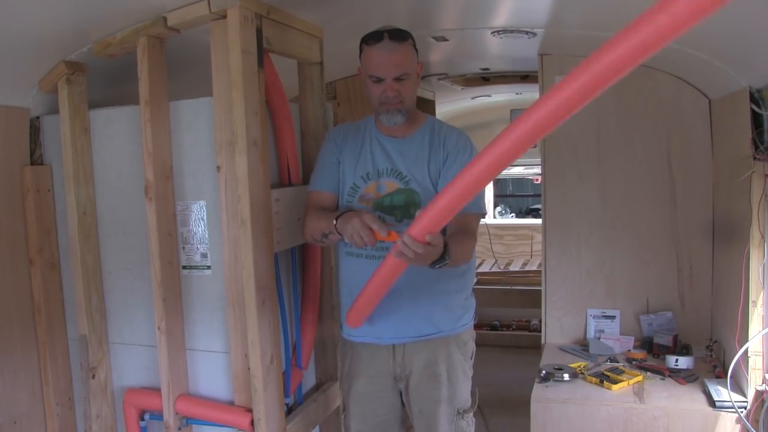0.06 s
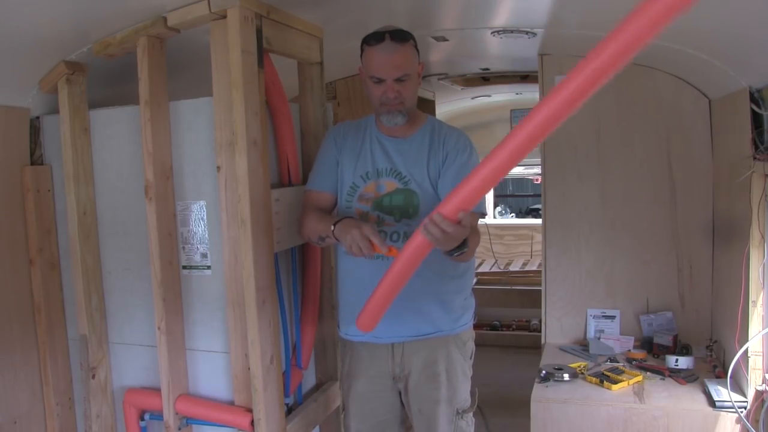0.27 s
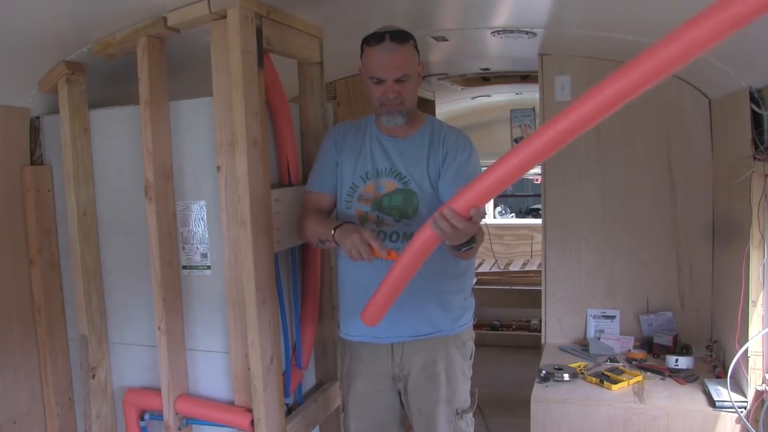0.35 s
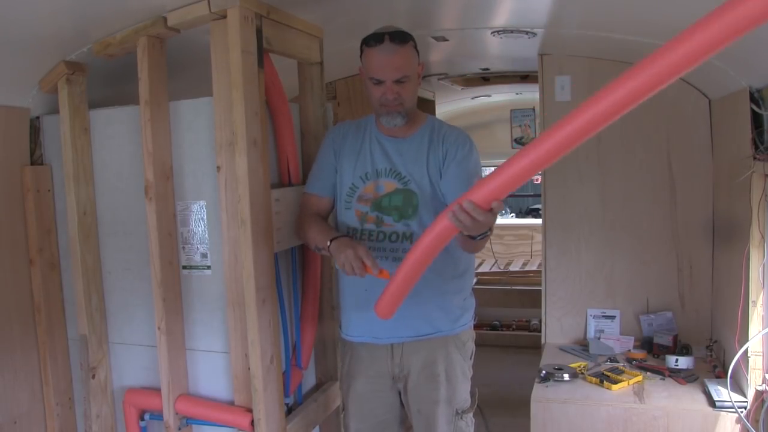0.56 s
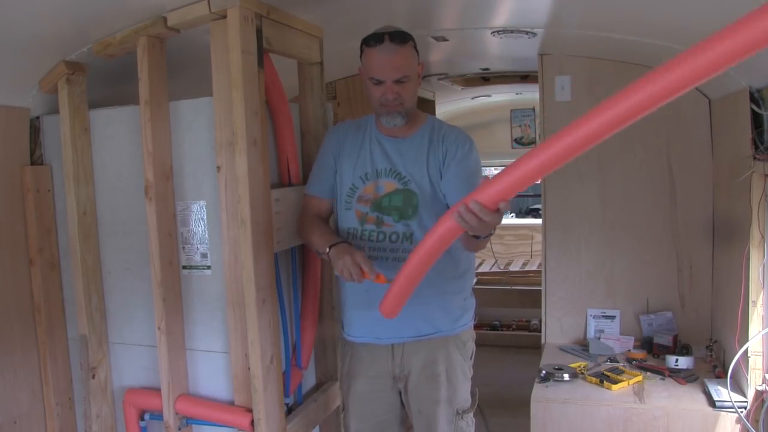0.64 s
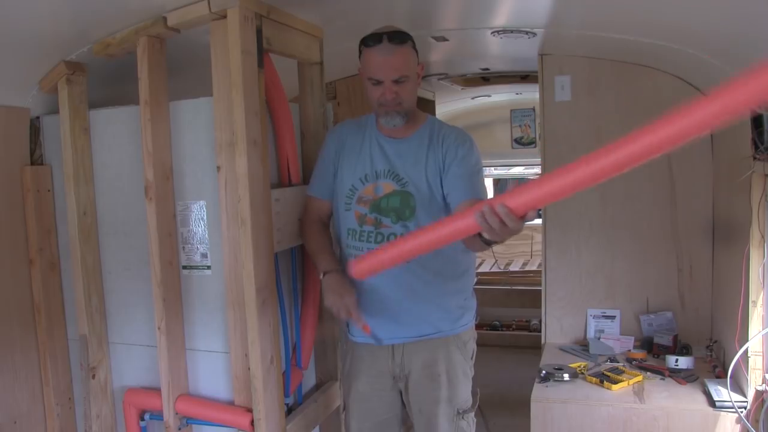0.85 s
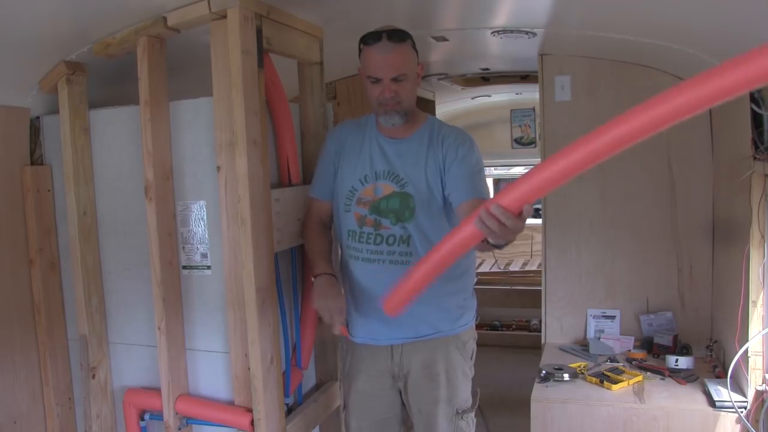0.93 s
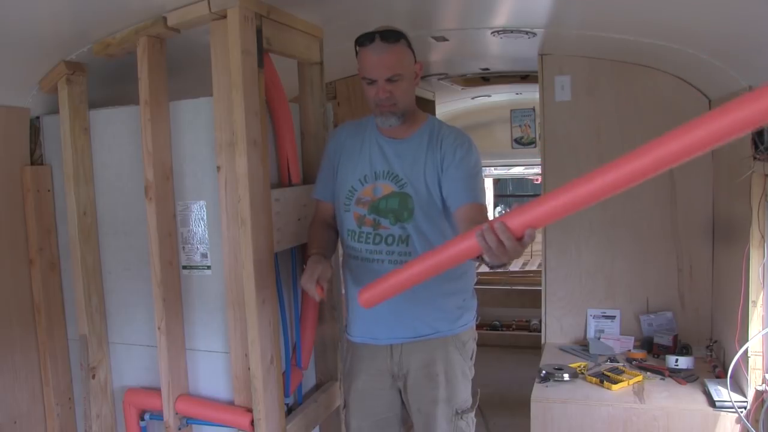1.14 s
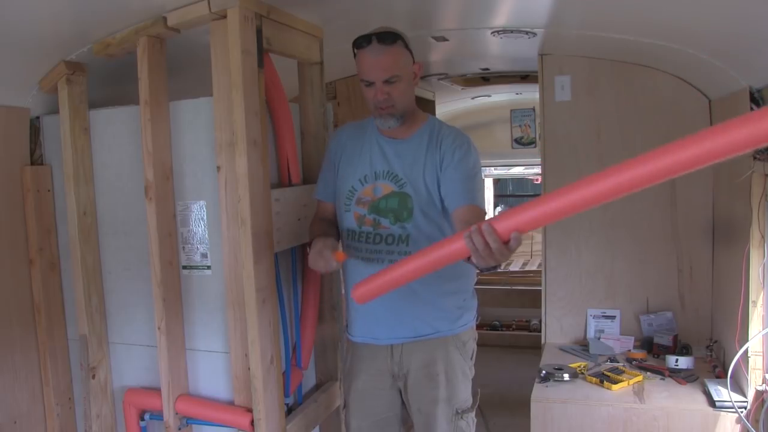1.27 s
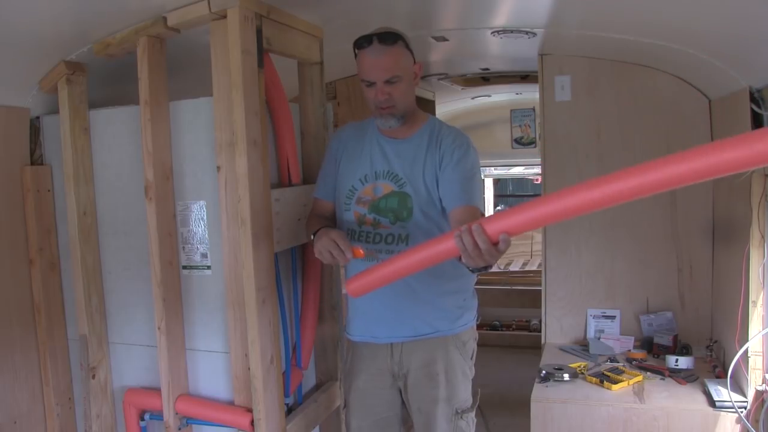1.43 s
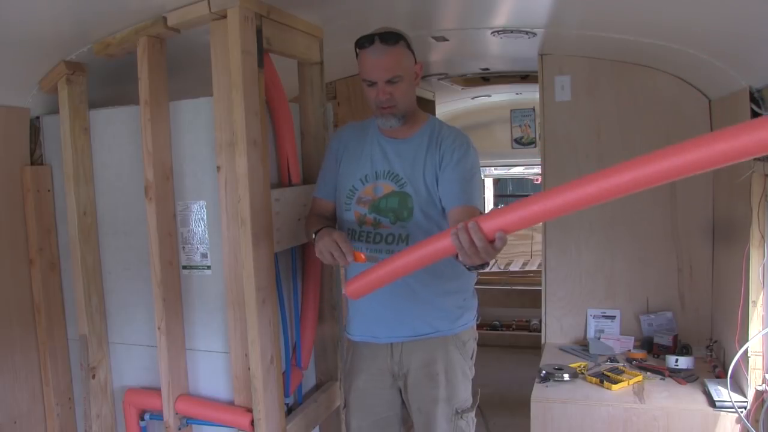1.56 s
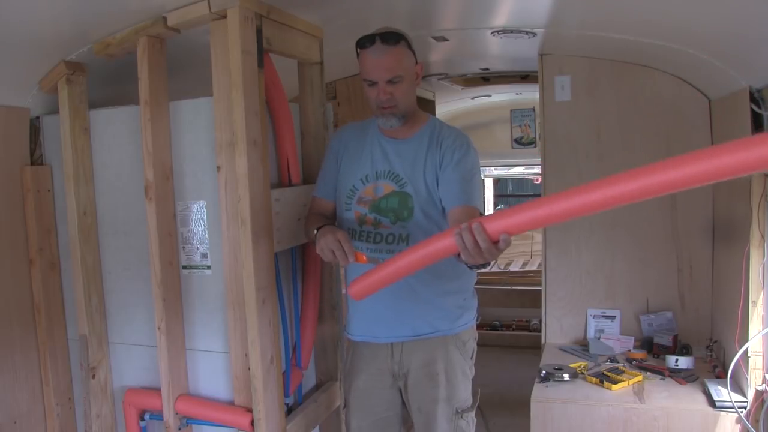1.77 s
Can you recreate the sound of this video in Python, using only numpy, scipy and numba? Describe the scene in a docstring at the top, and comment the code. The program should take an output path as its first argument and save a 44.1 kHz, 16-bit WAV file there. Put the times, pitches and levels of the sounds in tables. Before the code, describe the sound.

In a small room, a blade crackles and snags through a foam tube, then rips out the end. The cut piece bounces hollowly, followed by light taps, faint bird chirps and a soft creak of gripped foam.

```python
"""In a small wood-lined room, hands brush a foam tube and a utility knife enters it with a soft knock.
Through one long stroke the blade bursts foam cells in a dense, catching crackle that excites the tube's
resonance; a short rip out through the end follows. A cut piece drops and bounces with hollow thumps, and
hands brush and tap it. Last, a bird outside gives two faint rising whistles, a second one twitters,
and the foam creaks under a fresh grip."""
import sys
import numpy as np
from scipy import signal
from scipy.fft import rfft, irfft
from scipy.io import wavfile
from numba import njit

SR = 44100
rng = np.random.default_rng(int(sys.argv[2]) if len(sys.argv) > 2 else 0)


def transcribe(signal):
    """Save signal, clipped to [-1, 1], as a 16-bit WAV file at the path in sys.argv[1]."""
    frames = np.atleast_2d(signal).T
    limited = np.clip(frames, -1, 1)
    pcm = np.round(limited * 32767).astype(np.int16)
    wavfile.write(sys.argv[1], SR, pcm)


N = 79380

# spectrum of light contact with the foam: f/Hz, relative spectral level/dB
CONTACT_SPECTRUM = [(50, -17), (150, -27), (500, -14), (900, -10), (1400, -4.5), (2300, -0.5), (3600, -7),
                    (4600, -7.5), (6500, -7.5), (9500, -18.5), (14000, -17.5), (16000, -32)]
# spectrum of the blade's snaps and knock: f/Hz, relative spectral level/dB
SNAP_SPECTRUM = [(40, -47), (140, -28), (450, -22), (700, -2), (1300, -2.5), (2700, -4.5), (3700, -6),
                 (7500, -16), (9500, -27), (16000, -41)]
TUBE_WIDTH_HZ, CONTACT_RISE_S = 420, 0.00027


def undb(db):
    """Amplitude ratio of a level in decibels."""
    return 10 ** (np.asarray(db) / 20)


def unit(x):
    """Normalisation to rms 1."""
    return x / np.sqrt(np.mean(x ** 2) + 1e-18)


def convolve(x, response):
    """Convolution: the output of a linear system with this impulse response."""
    return signal.fftconvolve(x, response)[:N]


def colour(x, points, size=4096):
    """Minimum-phase filter of unit power gain, shaped by (f/Hz, level/dB) points."""
    hz, db = np.array(points).T
    log_hz = np.log(np.fft.rfftfreq(size, 1 / SR) + 1)
    cepstrum = irfft(np.log(undb(np.interp(log_hz, np.log(hz), db))))
    cepstrum[1:size // 2] *= 2  # folding the cepstrum makes the filter causal
    cepstrum[size // 2 + 1:] = 0
    response = irfft(np.exp(rfft(cepstrum)))
    return convolve(x, response / np.linalg.norm(response))


@njit
def resonate(x, hz, width_hz):
    """Second-order resonance with a moving centre frequency and unit gain there."""
    y, band_state, low_state = np.empty(len(x)), 0., 0.
    for i in range(len(x)):
        g, damping = np.tan(np.pi * hz[i] / SR), width_hz / hz[i]
        band = (band_state + g * (x[i] - low_state)) / (1 + g * (g + damping))
        band_state, low_state = 2 * band - band_state, low_state + 2 * g * band
        y[i] = damping * band
    return y


def ring_at(x, hz, width_hz):
    """Resonance at a constant frequency."""
    return resonate(x, np.full(len(x), float(hz)), float(width_hz))


def low_pass(x, hz, order=2):
    """Attenuation above a cutoff frequency."""
    return signal.sosfilt(signal.butter(order, hz, fs=SR, output="sos"), x)


def walk(per_s):
    """Random fluctuation: linear interpolation between Gaussian values."""
    return np.interp(np.arange(N) / SR * per_s, np.arange(N), rng.standard_normal(N))


def add(out, start, sound):
    """Superposition of a sound from its start time on."""
    i = max(int(start * SR), 0)
    out[i:i + len(sound)] += sound[:N - i]


def burst(rise_s, decay_s, size=4096):
    """Transient noise with exponential rise and decay."""
    t = np.arange(size) / SR
    return rng.standard_normal(size) * (1 - np.exp(-t / rise_s)) * np.exp(-t / decay_s)


def cells(per_s, spread_db):
    """Shot noise: independent clicks of very unequal size."""
    size = undb(spread_db * np.minimum(rng.exponential(size=N), np.pi))
    fires = rng.random(N) < per_s / SR
    return unit(fires * size * np.sign(rng.standard_normal(N)))


def squeak(peak, db, half_width_s, hz, width_hz):
    """Narrow-band noise under a Gaussian envelope, heard as a brief, rough note."""
    note = ring_at(ring_at(rng.standard_normal(N), hz, width_hz), hz, width_hz)
    envelope = np.exp(-((np.arange(N) / SR - peak) / half_width_s) ** 2)
    return undb(db) * envelope * unit(note)


def air():
    """Stationary noise: the still room's background, strongest in the bass."""
    # background spectrum: f/Hz, relative spectral level/dB
    spectrum = [(25, 1.5), (55, -18), (92, 8), (140, -7.5), (250, -9), (600, -11), (1500, -16.5),
                (3000, -18), (6000, -22), (10000, -24), (16000, -24)]
    return undb(-56.5) * colour(rng.standard_normal(N), spectrum)


def brushes():
    """Sliding friction: skin moves over the foam in short swells of fine crackle."""
    # hand movements: peak t/s, level/dB, rise/s, fall/s (each between peak and about half amplitude)
    slides = [(.015, -39, 0.067, 0.017), (0.096, -37.5, 0.019, 0.0089), (1.06, -41.5, 0.15, 0.041),
              (1.225, -48, 0.023, 0.038), (1.281, -39, 0.013, 0.014), (1.6, -50.5, 0.0071, 0.011),
              (1.63, -57.5, 0.024, 0.022), (1.775, -51.5, 0.032, .05)]
    t, swell = np.arange(N) / SR, np.zeros(N)
    for peak, db, rise, fall in slides:
        from_peak = 1.35 * (t - peak) / np.where(t < peak, rise, fall)
        swell += undb(db) / np.cosh(np.clip(from_peak, -20, 20))
    return swell * colour(cells(per_s=5400, spread_db=1.5), CONTACT_SPECTRUM)


def cut(course, spectrum):
    """Source and filter: bursting cells drive a tube resonance that moves with blade and grip."""
    # body of the sound, thin early on, fuller as the slit lengthens: t/s, bass gain/dB, low-mid gain/dB
    fullness = [(.15, 0, 4), (.225, -8.5, -29), (0.281, -8, 3.5), (.36, -2, -2), (.45, -1, 5),
                (.58, -2.5, -10.5), (.71, 3.5, -2), (.8, 1.5, -5.5), (.9, 2.5, 1.5)]
    t = np.arange(N) / SR
    times, db, hz = np.array(course).T
    body_times, bass_db, low_mid_db = np.array(fullness).T
    bursts = cells(per_s=5000, spread_db=5)
    catching = undb(2 * walk(per_s=230))  # cells burst in clumps as the blade catches and slips
    crackle = colour(bursts * catching, spectrum)
    tube = undb(1) * resonate(crackle, np.interp(t, times, hz), TUBE_WIDTH_HZ)
    bass = signal.sosfiltfilt(signal.butter(2, 474, fs=SR, output="sos"), crackle)
    low_mids = ring_at(crackle, hz=847, width_hz=380)
    bass_change = (undb(np.interp(t, body_times, bass_db)) - 1) * bass
    low_mid_change = (undb(np.interp(t, body_times, low_mid_db)) - 1) * low_mids
    envelope = undb(np.interp(t, times, db)) * (t > times[0]) * (t < times[-1])
    return envelope * unit(crackle + tube + bass_change + low_mid_change)


def long_stroke():
    """Progressive fracture: the blade bursts cell after cell along the tube."""
    # course of the stroke: t/s, level/dB, tube resonance f/Hz
    course = [(.125, -60, 1944), (.14, -40.5, 1750), (.218, -30.5, 1920), (.23, -22.5, 1700),
              (.249, -19.5, 1730), (.257, -12, 1710), (.305, -17.5, 1860), (.35, -17, 1420),
              (.362, -20.5, 1500), (.45, -26.5, 1900), (.53, -16.5, 1300), (.585, -24, 1370),
              (.605, -22, 1470), (.635, -23.5, 1480), (.655, -15.5, 1600), (.68, -28.5, 1780),
              (.714, -20.5, 1840), (.735, -44, 1800), (.775, -30, 2000)]
    # spectrum of the bursting cells: f/Hz, relative spectral level/dB
    spectrum = [(40, -48), (80, -20.5), (140, -12), (260, -3.5), (430, -12.5), (540, -8.5), (640, 1),
                (800, -7), (1020, -6.5), (1250, -2), (2150, -5), (2750, -0.5), (3650, -11), (4600, -7.5),
                (6000, -7.5), (7900, -12.5), (9200, -20), (13000, -19), (16000, -25)]
    return cut(course, spectrum)


def knock():
    """Impact excitation: the blade meets the tube wall, which answers with a soft, boxy resonance."""
    # impact on the wall: t/s, level/dB, resonance f/Hz
    impacts = [(0.1353, -36, 476)]
    out = np.zeros(N)
    for start, db, hz in impacts:
        push = burst(CONTACT_RISE_S, decay_s=0.004)
        contact = colour(push, SNAP_SPECTRUM)[:len(push)]
        ring = undb(22) * ring_at(push, hz, width_hz=180)
        add(out, start, undb(db) * (contact + ring))
    return out


def snags():
    """Sudden release of stress: the snagged blade snaps free, many cells give way and the tube rings."""
    # releases of the blade: t/s, level/dB, tube resonance f/Hz
    releases = [(.183, -30.5, 2520), (0.258, -17, 1800), (.273, -12, 1740), (.282, -17, 1750),
                (.2975, -22, 1800), (0.323, -14.5, 2380), (0.349, -9, 1350), (.505, -11, 1900),
                (.542, -9, 1450), (0.557, -13, 1500), (0.603, -9, 1400), (.656, -14, 1570),
                (.7995, -9.5, 2520), (0.8054, -6, 2610), (0.882, -18, 1390), (0.9016, -11.5, 1620)]
    out = np.zeros(N)
    for start, db, hz in releases:
        snap = burst(CONTACT_RISE_S, decay_s=0.0012)
        snap[0] = undb(5.5)  # sharp leading click
        ring = undb(7) * ring_at(snap, hz, TUBE_WIDTH_HZ)
        add(out, start, undb(db) * (snap + ring))
    return colour(out, SNAP_SPECTRUM)


def rip():
    """Rapid fracture: the blade tears out through the end, and the tube's resonance drops."""
    # course of the rip: t/s, level/dB, tube resonance f/Hz
    course = [(.773, -41, 2423), (.779, -22.5, 2270), (.796, -20.5, 2390), (.801, -13.5, 2560),
              (.822, -17, 2650), (.84, -18.5, 2350), (.868, -22, 1500), (.886, -16.5, 1350),
              (.902, -23.5, 1350), (.912, -38.5, 1410), (.97, -38, 1700)]
    # spectrum of the bursting cells: f/Hz, relative spectral level/dB
    spectrum = [(40, -36), (90, -35), (200, -6.5), (480, -7), (740, -0.5), (1050, -5.5), (1300, -2.5),
                (1700, -3), (2600, -4), (3300, -8), (5300, -8.5), (7700, -13.5), (9500, -21.5),
                (13000, -20), (16000, -27)]
    return cut(course, spectrum)


def thumps():
    """Damped modes: each blow rings the foam with a thud and a tick of its own brightness."""
    # blows: t/s, body level/dB, body cutoff f/Hz, tick level/dB, tick cutoff f/Hz
    blows = [(0.976, -15, 263, -25, 4500), (.996, -19, 2000, -20.5, 5450), (1.005, -15, 1120, -42, 4000),
             (1.018, -19.5, 1020, -44, 4000), (1.048, -22.5, 1810, -28.5, 5470),
             (1.057, -20.5, 1000, -42, 4000), (1.069, -22.5, 990, -58, 4000),
             (1.192, -27.5, 187, -34, 12000), (1.206, -27, 183, -31, 14000), (1.27, -39, 128, -50, 8000)]
    # hollow modes: f/Hz, relative level/dB, T60/s
    modes = [(101.2, -10.5, 0.35), (117.6, -9.5, 0.22), (175.5, 4.5, 0.061), (214.9, -4.5, 0.22),
             (246.5, 0.5, 0.13), (340.4, 3, 0.11), (441, 0, 0.2), (549, -11.5, 0.15), (690, -6.5, 0.18),
             (754, -8, 0.097), (918, -6, 0.1), (1020, -4, 0.18), (1190, -6, 0.11)]
    # spectrum of the thud: f/Hz, relative spectral level/dB
    thud_spectrum = [(30, -33), (65, -27), (110, -9.5), (200, 4.5), (330, 0), (550, -5), (1000, -12),
                     (1500, -12), (4000, -19), (16000, -73)]
    t, body, ticks = np.arange(N // 3) / SR, np.zeros(N), np.zeros(N)
    for start, db, cutoff_hz, tick_db, tick_hz in blows:
        signs = rng.choice([-1, 1], len(modes))
        ring = sum(sign * undb(mode_db) * np.cos(2 * np.pi * hz * t) * np.exp(-np.log(1000) * t / t60)
                   for sign, (hz, mode_db, t60) in zip(signs, modes))
        thud = colour(burst(rise_s=0.00077, decay_s=0.0092), thud_spectrum)
        blow = undb(-9) * ring
        add(blow, 0, undb(1.5) * thud)
        add(body, start, undb(db) * low_pass(blow, cutoff_hz, order=3))
        tick = burst(CONTACT_RISE_S, decay_s=0.0029)
        add(ticks, start, undb(tick_db) * low_pass(tick, tick_hz))
    return body + colour(ticks, CONTACT_SPECTRUM)


def whistles(lead_s=0.019, knee_hz=1990, rise_s=0.031, fall_s=0.021):
    """Frequency modulation: a bird's pure tone climbs to a knee, sweeps up and holds its top note."""
    # calls: t/s, duration/s, level/dB, starting f/Hz, top f/Hz, sweep time/s
    calls = [(1.502, 0.1, -46, 1545, 3630, .047), (1.645, .064, -45.5, 1810, 3660, 0.039)]
    t, out = np.arange(N) / SR, np.zeros(N)
    for start, length, db, low_hz, top_hz, sweep_s in calls:
        lead = np.interp(t, [0, lead_s], [low_hz, knee_hz])
        glide = np.sin(np.pi / 2 * np.clip((t - lead_s) / sweep_s, 0, 1))
        waver = 1 + 0.008 * walk(per_s=440)
        hz = (lead + (top_hz - knee_hz) * glide) * waver
        tone = np.sqrt(2) * np.sin(2 * np.pi * np.cumsum(hz) / SR)
        envelope = np.clip(t / rise_s, 0, 1) * np.clip((length - t) / fall_s, 0, 1)
        add(out, start, undb(db) * envelope * tone)
    return out


def twitter(half_width_s=0.0092):
    """Pitch from narrow-band noise: a second bird's faint, high chirps."""
    # chirps: peak t/s, level/dB, f/Hz
    chirps = [(1.6, -51.5, 4300), (1.622, -62, 4400), (1.641, -50.5, 3930), (1.655, -62, 4400),
              (1.712, -56, 4000), (1.735, -57, 4550)]
    return sum(squeak(peak, db, half_width_s, hz, width_hz=740) for peak, db, hz in chirps)


def creaks():
    """Stick-slip friction: fingers take a fresh grip on the foam in brief, narrow squeaks."""
    # slips: peak t/s, level/dB, envelope half-width/s, f/Hz
    slips = [(1.612, -55, 0.017, 1330), (1.757, -52, 0.021, 1380), (1.795, -46, 0.0053, 1520)]
    return sum(squeak(peak, db, half_width_s, hz, width_hz=360) for peak, db, half_width_s, hz in slips)


def room(x, wet_db, gap_s=0.003, drift_hz=1.585):
    """Reverberation: dense echoes of close walls, whose pattern changes as the source moves."""
    # reverberation time by band: f/Hz, T60/s
    bands = [(100, 0.47), (500, 0.38), (2000, 0.33), (6000, 0.3), (15000, 0.26)]
    t, octaves = np.arange(N) / SR, np.log2(np.fft.rfftfreq(N, 1 / SR) + 1)
    centres = np.log2([hz for hz, _ in bands])
    shares = [np.interp(octaves, centres, row) for row in np.eye(len(bands))]
    turn, echoes = 2 * np.pi * drift_hz * t, np.zeros(N)
    for weight in (np.cos(turn), np.sin(turn)):  # crossfade between two echo patterns
        noise = rfft(rng.standard_normal(N))
        tail = (t > gap_s) * sum(irfft(noise * share, N) * np.exp(-np.log(1000) * t / t60)
                                 for share, (_, t60) in zip(shares, bands))
        echoes += convolve(x * weight, tail / np.linalg.norm(tail))
    return (x + undb(wet_db) * echoes) / np.sqrt(1 + undb(2 * wet_db))


def scene():
    """Superposition of foam, thumps and birds, each with its share of reverberation, over still air."""
    foam = brushes() + long_stroke() + knock() + snags() + rip() + creaks()
    birds = whistles() + twitter()
    return (air() + room(foam, wet_db=-4) + room(thumps(), wet_db=-11.5) + room(birds, wet_db=-3.5))[None]


def record(dry, ceiling=0.97, top_hz=15850):
    """Soft saturation rounds the highest peaks; a steep low-pass limits the bandwidth."""
    rounded = ceiling * np.tanh(dry / ceiling)
    return signal.sosfilt(signal.ellip(10, .2, 80, top_hz, fs=SR, output="sos"), rounded)


dry = scene()
out = record(dry)
transcribe(out)
```